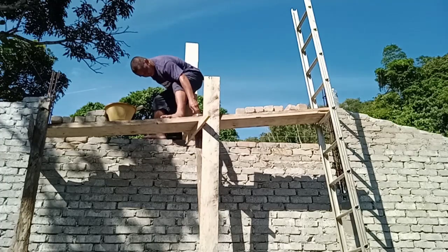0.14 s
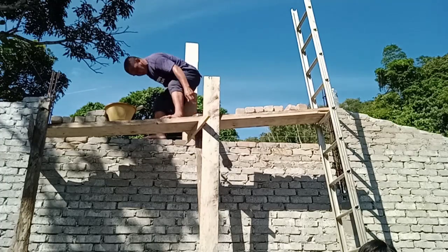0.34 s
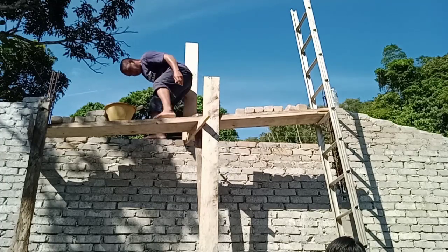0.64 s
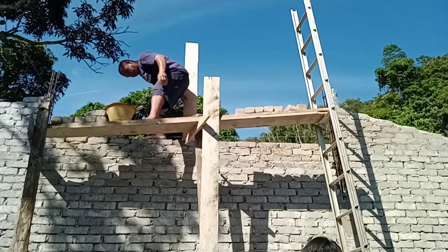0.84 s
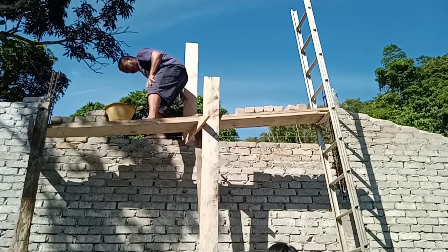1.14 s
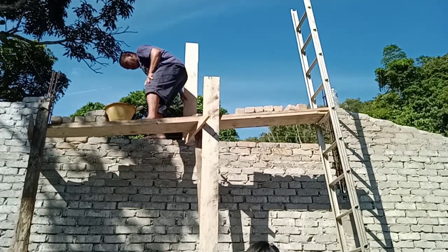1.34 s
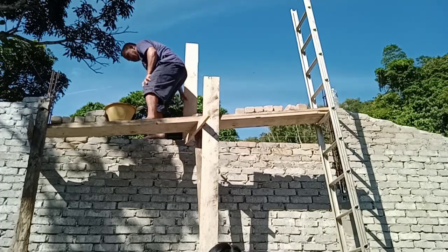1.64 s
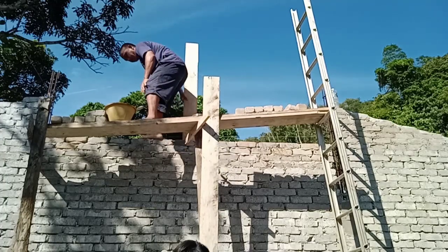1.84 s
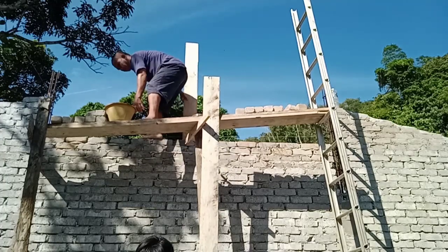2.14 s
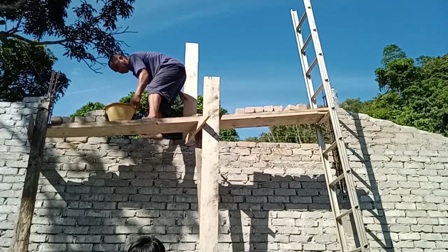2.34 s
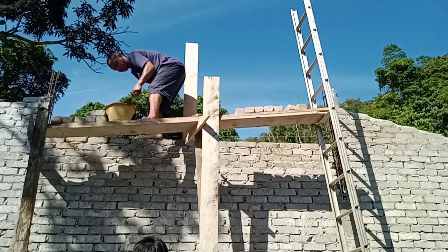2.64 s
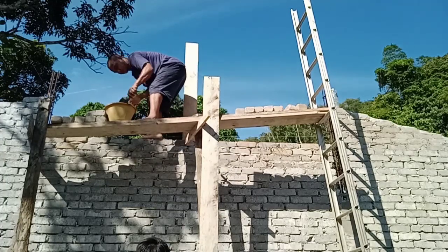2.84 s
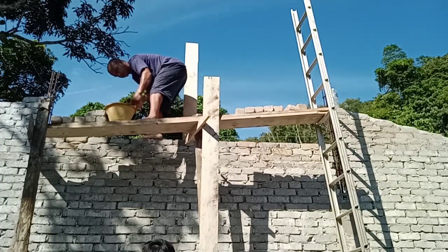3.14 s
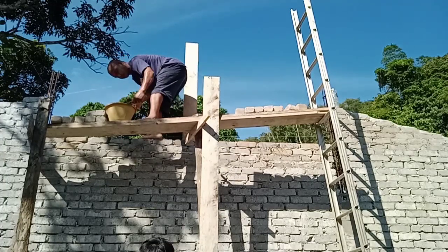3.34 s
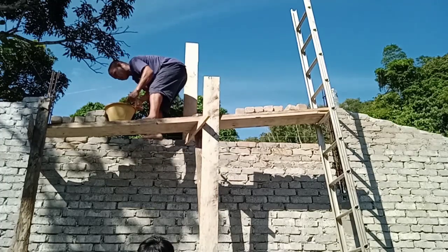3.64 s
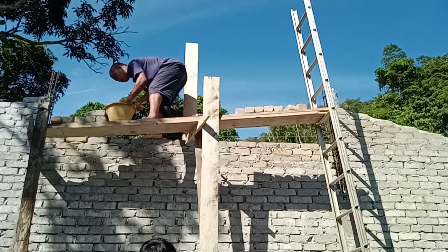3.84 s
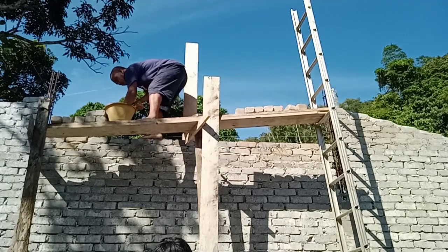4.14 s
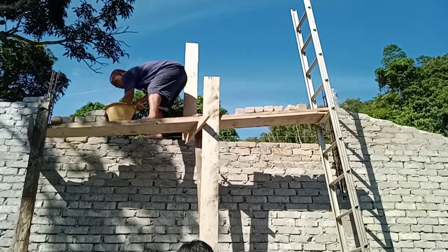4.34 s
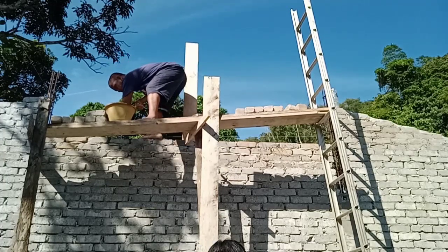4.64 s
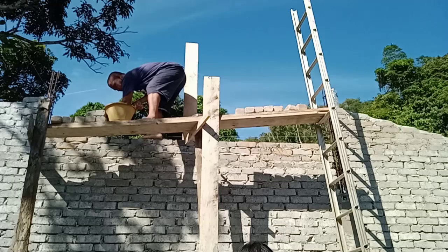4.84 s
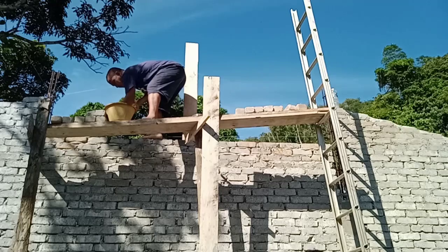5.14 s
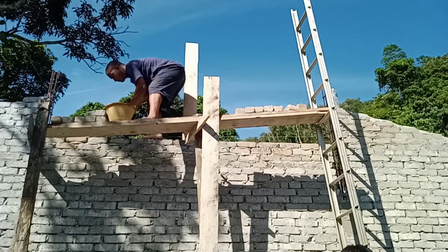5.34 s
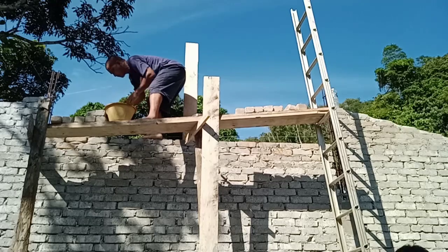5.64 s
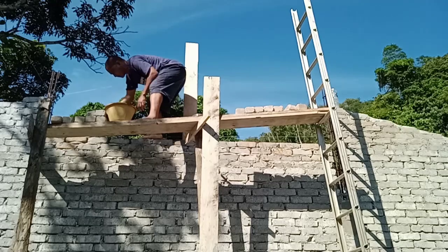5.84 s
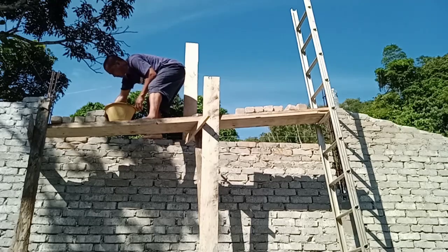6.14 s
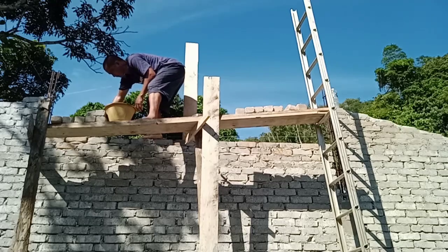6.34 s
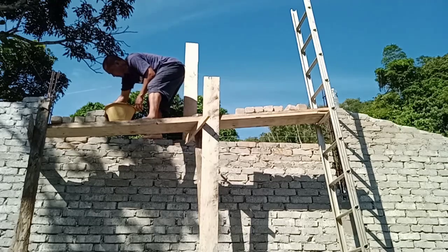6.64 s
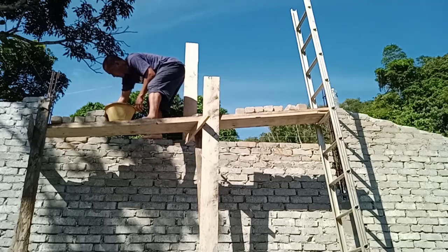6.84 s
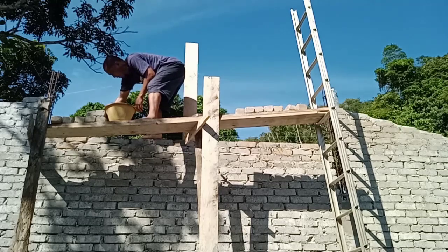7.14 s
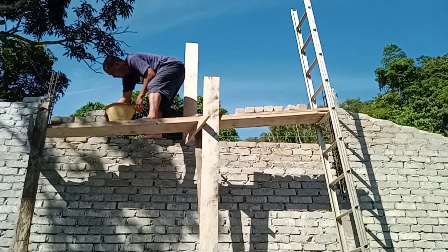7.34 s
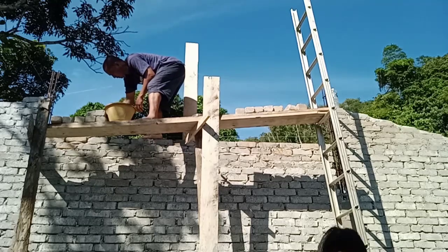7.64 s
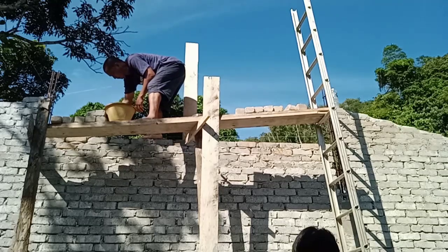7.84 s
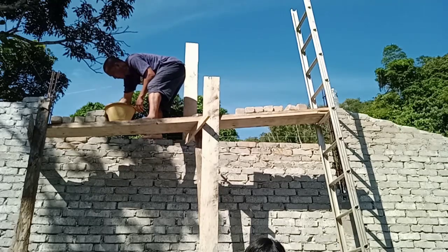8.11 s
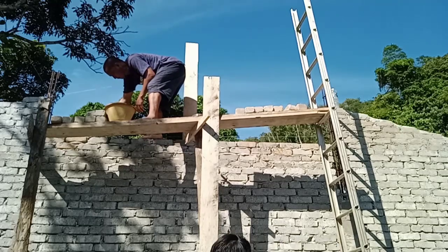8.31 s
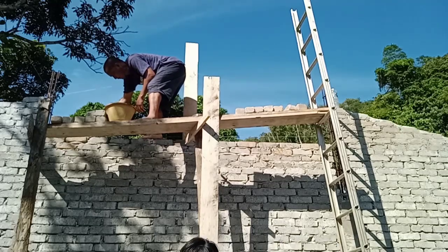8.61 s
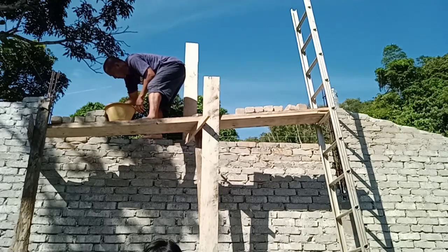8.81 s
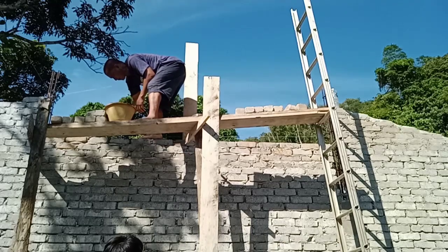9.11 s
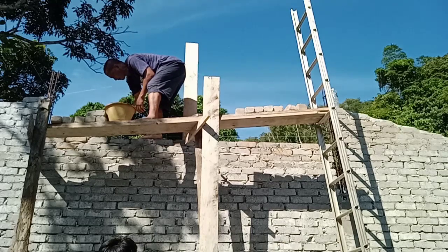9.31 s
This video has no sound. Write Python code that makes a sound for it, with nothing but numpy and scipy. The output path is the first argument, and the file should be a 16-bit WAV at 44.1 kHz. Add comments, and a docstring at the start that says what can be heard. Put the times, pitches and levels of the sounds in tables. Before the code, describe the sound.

A mason works outdoors: heavy woody brick thuds, then gritty scrapes and light trowel taps, with cicadas, faint crickets and brief bird whistles.

```python
"""A mason works on a plank scaffold: bricks thud on the boards, a trowel knocks and scrapes in the mortar tub.
Blows are clattering contacts that ring plank modes and crack off the brick; scrapes are filtered sand-grain clicks.
Cicadas drone as patchy noise, crickets trill and birds whistle as nearly pure tones, over a hum and faint air.
Walls and trees throw the work back as a sparse-tap echo."""
import sys
import numpy as np
from scipy import signal
from scipy.fft import rfft, irfft
from scipy.io import wavfile
from scipy.ndimage import uniform_filter1d

SR = 44100
rng = np.random.default_rng(int(sys.argv[2]) if len(sys.argv) > 2 else 0)


def waveform_to_disk(signal):
    """Save audio, clipped to [-1, 1], as 16-bit WAV at the path in sys.argv[1]."""
    frames = np.transpose(np.atleast_2d(signal))
    scaled = np.clip(frames, -1, 1) * 32767
    samples = np.round(scaled).astype(np.int16)
    wavfile.write(sys.argv[1], SR, samples)


def nominal_scale(level):
    """Amplitude ratio for a level in decibels (scalar or array-like)."""
    x = np.asarray(level, float) / 20
    return 10 ** x


N = 417627  # samples

HUM_HZ, HUM_WIDTH_HZ = 1260, 18  # narrow resonance, loudest when the mortar tub is rubbed


def evened(x):
    """Scales to rms 1."""
    return x / np.sqrt(np.mean(x ** 2) + 1e-20)


def read(points, hz):
    """Interpolates a (f/Hz, value) table on a log-frequency axis."""
    f, value = np.transpose(points)
    return np.interp(np.log(hz + 1), np.log(f + 1), value)


def add(mix, s, sound):
    """Mixes a sound in at time s, in place."""
    part = mix[max(round(s * SR), 0):][:len(sound)]
    part += sound[:len(part)]


def colour(x, points):
    """Filters by a spectrum, then scales to rms 1."""
    gain = nominal_scale(read(points, np.fft.rfftfreq(len(x), 1 / SR)))
    return evened(irfft(rfft(x) * gain, len(x)))


def resonate(x, hz, width_hz):
    """Resonance of gain 1: shifts hz down to zero, smooths, shifts back."""
    turn = np.exp(2j * np.pi * np.cumsum(hz * np.ones(len(x))) / SR)
    r = np.exp(-np.pi * width_hz / SR)
    return 2 * (turn * signal.lfilter([1 - r], [1, -r], x / turn)).real


def wander(hz):
    """Slow chance of rms 1, changing about hz times a second."""
    size = round(SR / hz)
    knots = N // size + 2
    return evened(np.interp(np.arange(N), np.arange(knots) * size, rng.standard_normal(knots)))


def grains(per_s, spread_db, size=N):
    """Sparse clicks of random sign, a few of them large."""
    chance, sign, big = rng.random(size), rng.standard_normal(size), rng.exponential(1, size)
    return (chance < per_s / SR) * sign * nominal_scale(spread_db * np.minimum(big, 4))


def patchy(x, points, patchy_db, size=(5, 6)):
    """Colours x by a spectrum and by loud and soft patches of size (bins, frames); rms 1."""
    hz, t, z = signal.stft(x, SR, nperseg=512, noverlap=256)
    patches = rng.standard_normal(z.shape[::-1]).T
    patches = uniform_filter1d(patches, size=size[0], axis=0)
    patches = evened(uniform_filter1d(patches, size=size[1], axis=1))
    z = z * nominal_scale(read(points, hz)[:, None] + patchy_db * patches)
    return evened(signal.istft(z, SR, nperseg=512, noverlap=256)[1][:N])


def open_air():
    """Faint broadband noise, alike in both channels."""
    # spectrum of the air: f/Hz, relative density/dB
    air_spectrum = [(18, -43), (30, 0), (48, 12), (109, 1.5), (830, -6), (1120, -4.5), (1270, -7),
                    (1470, -11), (4410, -10), (4700, -55), (6110, -45.5), (10300, -120)]
    return nominal_scale(-71) * patchy(rng.standard_normal(N), air_spectrum, patchy_db=1.8)


def side_noise():
    """Faint noise of opposite sign left and right."""
    # spectrum of the left-right difference: f/Hz, relative density/dB
    side_spectrum = [(35, -33), (60, -7.5), (921, -12.5), (1260, -5.5), (1490, -10), (5310, -19),
                     (6270, -57.5), (8750, -45), (11400, -65.5), (19200, -120)]
    unlike = nominal_scale(-76.5) * patchy(rng.standard_normal(N), side_spectrum, patchy_db=3.0)
    return np.array([unlike, -unlike])


def faint_hum():
    """Noise through the narrow resonance, drifting in level around -79 dB."""
    tone = evened(resonate(rng.standard_normal(N), HUM_HZ, HUM_WIDTH_HZ))
    return tone * nominal_scale(-79 + 2.3 * wander(4.4))


def cicadas():
    """Many insects blur into patchy noise: a wavering drone and a thin top with its overtone."""
    # spectrum of the drone: f/Hz, relative density/dB
    drone_spectrum = [(3350, -50.5), (5400, -12), (5900, -19.5), (6520, -24), (7080, 2), (7340, 6.5),
                      (7720, 3.5), (8320, -3.5), (8750, -9), (11400, -46.5), (19200, -120)]
    # spectrum of the thin top: f/Hz, relative density/dB
    sheen_spectrum = [(8800, -32), (9300, -12.5), (10500, 0.5), (12000, -8.5), (13800, -10), (14600, -0.5),
                      (15400, 4)]
    drone = patchy(rng.standard_normal(N), drone_spectrum, patchy_db=1.4)
    sheen = patchy(rng.standard_normal(N), sheen_spectrum, patchy_db=5.0)
    return nominal_scale(-58 + 0.47 * wander(5.8)) * drone + nominal_scale(-70.5) * sheen


def crickets():
    """Nearly pure tones in soft chirps, about ten a second; leaves scatter a little fuzz around them."""
    # cricket that joins in, its tones creeping upwards: final f/Hz, climb/Hz
    rising = [(5185, 270), (5295, 215)]
    # steady cricket, one value a tone: f/Hz; starting level/dB; fade/(dB/s)
    steady_hz = 5210, 5345, 5430
    steady_db, fade_db_per_s = (-75, -75, -71.5), (0.5, 0.5, 0.2)
    rising_db = -71, -66.5
    joins_s, fade_in_s, creep_s = 1.8, 0.52, 3.8

    out, t = np.zeros(N), np.arange(N) / SR
    joined = np.clip((t - joins_s) / fade_in_s, 0, 1) ** 2
    tones = []
    for (final_hz, climb_hz), db in zip(rising, rising_db):
        tones.append((final_hz - climb_hz * np.exp((joins_s - t) / creep_s), joined * nominal_scale(db)))
    for hz, db, fade in zip(steady_hz, steady_db, fade_db_per_s):
        tones.append((hz, nominal_scale(db - fade * t)))
    for hz, level in tones:
        chirp_phase = 2 * np.pi * np.cumsum(10.5 + 1.9 * wander(3)) / SR
        chirp_db = 3.0 * np.sin(chirp_phase) + 1.8 * wander(26)
        out += level * nominal_scale(chirp_db) * np.sin(2 * np.pi * np.cumsum(hz + 9 * wander(30)) / SR)
    return out * (1 + .35 * wander(250))


def birds():
    """Short, nearly pure whistles that sag a little and flutter in level."""
    # whistles: t/s, length/s, starting f/Hz, level/dB
    whistles = [(0.01, 0.027, 6030, -52), (0.849, 0.11, 3050, -67), (0.957, 0.15, 3060, -68),
                (1.39, 0.038, 5650, -57), (5.051, 0.23, 3040, -64.5), (6.075, .04, 5630, -59.5),
                (8.79, .17, 5700, -72)]
    out = np.zeros(N)
    for s, length_s, hz, db in whistles:
        t = np.arange(0, length_s, 1 / SR)
        tone = np.sin(2 * np.pi * hz * t * (1 - 0.02 * t))
        add(out, s, nominal_scale(db) * tone * signal.windows.tukey(len(t), .4))
    return out * nominal_scale(2 * wander(60)) * (1 + .4 * wander(500))


def yard(x, echo_db):
    """Adds the echo off walls and trees: sparse taps of random sign, each band dying at its own speed."""
    # decay of the echo: f/Hz, t60/s
    decay = [(100, 0.8), (300, 0.48), (700, 0.37), (1300, 0.36), (2500, 0.4), (6000, 0.48)]
    taps = np.zeros(SR // 2)
    at = np.arange(300, len(taps) - 20, 20)
    taps[at + rng.integers(0, 20, len(at))] = rng.choice([-1., 1.], len(at))
    hz, t, z = signal.stft(taps, SR, nperseg=512)
    z = z * nominal_scale(-60 * t / read(decay, hz)[:, None])
    tail = signal.istft(z, SR, nperseg=512)[1]
    return x + nominal_scale(echo_db) * signal.oaconvolve(x, tail / np.linalg.norm(tail))[:len(x)]


def ring(centre_hz, octaves, damping):
    """The boards' answer to one click: decaying modes, favoured near centre_hz by the place struck.
    Loose planks lie side by side, so each mode is a cluster of three that differs from blow to blow."""
    # plank modes: f/Hz, width/Hz at damping 1, level/dB before the place struck weights it
    boards = [(94, 40, -4), (165, 40, -19.5), (301.3, 15, 0.5), (411, 15, -3), (586, 33, -8.5),
              (667, 24, -3), (734.4, 55, 5), (892, 35, -4), (1005, 32, -1), (1210, 27, -3.5), (1260, 60, 8),
              (1582, 56, 0), (1776, 70, -3), (1980, 31, -11.5), (2253, 270, -9.5), (2740, 200, -14.5),
              (3348, 120, -17)]
    hz, width_hz, db = np.repeat(np.transpose(boards), 3, axis=1)[:, :, None]
    hz = hz * (1 + 0.012 * rng.standard_normal(hz.shape))
    t = np.arange(SR // 4) / SR
    db = db - 6 * (np.log2(hz / centre_hz) / octaves) ** 2
    modes = nominal_scale(db) * np.exp(-np.pi * width_hz * damping * t) * np.sin(2 * np.pi * hz * t)
    return modes.sum(0) * np.cos(2 * np.pi * t)  # cosine reaches zero at the end


def stroke(length_s):
    """Pressure of one stroke: rise, hold, release."""
    t = np.arange(0, length_s + .3, 1 / SR)
    rise = np.minimum(t / (0.014 + 0.23 * length_s), 1) ** 0.99
    return rise * nominal_scale(-264.5 * np.maximum(t - length_s, 0))  # release in dB/s


def scrapes():
    """Sand grains slip under the stroke: a rasp that rings the tub, fine grit on top, a rumble in the boards."""
    # trowel and brick dragged through mortar: t/s, length/s, level/dB,
    # rumble in the boards/dB and fine grit/dB (both against the level)
    strokes = [ (0.07, 0.083, -54, -20, -12.5), (0.186, 0.086, -74, 7, -12), (0.605, 0.11, -63, -3.5, -23),
               (0.788, 0.077, -69, 0.5, -18), (0.904, 0.26, -69, -2, -22), (1.196, .07, -55, -32, -17),
               (1.265, 0.107, -66, 7, -20), (1.656, 0.065, -45.5, -6.5, -7.5),
               (1.75, 0.063, -72.5, 11, -11.5), (1.949, .05, -66, -14, -12.5),
               (2.091, 0.096, -65.5, -9, -10), (2.186, 0.094, -49, -13, -12.5),
               (2.582, 0.082, -52.5, 2.5, -12.5), (2.642, 0.097, -52.5, 4.5, -24),
               (2.696, .17, -45.5, 7.5, -26.5), (3.124, 0.11, -55.5, -17, -10),
               (3.23, 0.15, -64, -12, -10.5), (3.382, .1, -64, -16, -13.5), (3.497, 0.1, -66.5, -5, -12.5),
               (4.189, 0.087, -70, 5.5, -9), (4.303, 0.0515, -56.5, -12, -12), (4.569, 0.037, -64, 7, -23),
               (4.671, 0.076, -60.5, -1.5, -18), (4.82, .04, -69, -4, -16), (4.938, 0.027, -66, -26, -7),
               (4.989, .08, -72, 8, -12), (5.097, 0.106, -62.5, -15, -17.5), (5.329, 0.02, -57.5, 1.5, -17),
               (5.449, 0.043, -72, 2, -17), (5.499, .08, -59, -9.5, -3), (5.606, 0.05, -68.5, -5.5, -7.5),
               (5.763, 0.0827, -51.5, -18.5, -6.5), (5.865, .06, -57, -19, -9.5),
               (6.007, 0.11, -71.5, -2.5, -18), (6.26, 0.052, -66.5, -0.5, -18),
               (6.474, 0.15, -69.5, -8, -12), (6.626, 0.1, -62.5, -17, -8), (6.728, 0.061, -58.5, -8.5, -5),
               (6.86, 0.0371, -57.5, -18, -6), (7.188, 0.025, -69.5, -1, -9),
               (7.304, 0.076, -69.5, -5, -12), (7.364, 0.074, -50.5, -8.5, -14),
               (7.759, .05, -60.5, -6.5, -25), (7.938, 0.084, -68, -12.5, -4.5),
               (8.041, 0.0874, -53, -14.5, -13), (8.175, 0.017, -46.5, -7, -22),
               (8.246, .05, -55.5, -6.5, -4), (8.321, 0.086, -55.5, -2.5, -8),
               (8.45, 0.082, -67.5, -15, -5.5), (8.686, 0.047, -52.5, -11, -11.5),
               (8.723, 0.017, -70, 6, -17), (8.939, 0.014, -61.5, -23, -15.5),
               (9.027, 0.13, -65.5, -9.5, -14), (9.188, 0.091, -62, -8, -6),
               (9.379, 0.036, -60.5, -14, -11), (9.447, .04, -57, -17, -21)]
    # spectrum of the rasp: f/Hz, relative density/dB
    rasp_spectrum = [(290, -23.5), (500, -11), (959, -5.5), (1220, -3.5), (1490, -4), (2560, -2),
                     (4350, -5.5), (5430, -4.5), (7000, -20.5), (9100, -34), (15400, -120)]
    # spectrum of the grit: f/Hz, relative density/dB
    grit_spectrum = [(5000, -37), (6500, 8), (9000, -0.5), (12000, -7.5), (14000, -11.5), (16000, -2)]
    rasp = patchy(grains(4000, 0.93), rasp_spectrum, patchy_db=4, size=(3, 12))
    rasp = rasp + nominal_scale(-7.5) * evened(resonate(rasp, HUM_HZ, HUM_WIDTH_HZ))
    grit = colour(grains(3000, 2.0), grit_spectrum)
    rumble = evened(signal.oaconvolve(grains(2000, 3.1), ring(380, 7.5, 2.2))[:N])
    pressure = np.zeros((3, N))
    for s, length_s, level_db, rumble_db, grit_db in strokes:
        for layer, db in zip(pressure, (0, rumble_db, grit_db)):
            add(layer, s, nominal_scale(level_db + db) * stroke(length_s))
    out = (pressure * [rasp, rumble, grit]).sum(0)
    return yard(out * nominal_scale(3.3 * wander(40)), echo_db=-8.5)


def blow(level_db, centre_hz, octaves, clatter_s, crack_db, build_s, damping, echo_db):
    """A blow is a short clatter of contacts: they ring the boards and crack off the brick itself."""
    t = np.arange(SR // 5) / SR
    decay = np.exp(-(t / max(clatter_s, .001)) ** 0.88)
    contacts = grains(6000, 0.94, len(t)) * np.minimum(t / build_s, 1) * decay
    contacts[round(.001 * SR)] += 1.3 * np.sqrt(np.mean(contacts[:441] ** 2))  # firm touch 1 ms in
    hz = np.geomspace(50, 16000, 20)
    away = np.log2(hz / centre_hz) / octaves
    crack_spectrum_db = -np.where(away > 0, 5.5, 7.5) * away ** 2
    crack = colour(contacts, np.transpose([hz, crack_spectrum_db]))
    sound = evened(signal.fftconvolve(contacts, ring(centre_hz, octaves, damping)))
    sound[:len(t)] += nominal_scale(crack_db) * crack * np.cos(2.5 * np.pi * t)  # cosine fades the crack out
    loudest = np.sqrt(uniform_filter1d(sound ** 2, size=441).max())  # 10 ms rms
    return nominal_scale(level_db - 10.0) * yard(np.pad(sound, (0, SR // 4)), echo_db) / loudest


def add_knocks(work):
    """Trowel and brick knocks: brief, well-damped blows, each ringing around its own centre."""
    # knocks: t/s, level/dB (loudest 10 ms rms before echo, plus 10), ring centre f/Hz,
    # spread/octaves, crack against ring/dB
    knocks = [(0.973, -46, 1230, 0.37, 5), (1.347, -45.5, 299, 0.53, 6), (1.71, -34.5, 303, 0.46, 24),
              (2.982, -36.5, 423, 0.97, 15), (3.401, -48, 2960, 0.37, 16), (4.577, -28, 810, 1.06, 5.5),
              (4.826, -36.5, 1090, 0.7, -3), (5.011, -49, 1212, 0.77, -11), (5.125, -48.5, 1260, 0.2, -11),
              (5.34, -39.5, 1290, 1, -2), (5.505, -46.5, 1320, 0.6, 24), (5.896, -36.5, 1380, 0.97, 9),
              (5.919, -42, 457, 0.77, 8), (6.307, -52, 2600, 0.9, 7), (6.925, -46, 285, 0.23, 13),
              (6.96, -51, 304, 0.322, 9), (7.556, -45, 276, 0.6, 0), (7.778, -47.5, 1700, 0.44, 19),
              (7.977, -52.5, 1610, 0.27, 12), (8.058, -49, 1350, 0.27, -12), (8.182, -33.5, 1380, 0.67, 13),
              (8.265, -38.5, 1280, 0.91, -13), (8.363, -32.5, 600, 0.87, 20), (8.389, -39, 560, 0.16, 12),
              (8.749, -40.5, 1800, 0.85, 5.5), (9.033, -48, 586, 0.51, 1)]
    for s, level_db, hz, octaves, crack_db in knocks:
        knock = blow(level_db, hz, octaves, clatter_s=0.017, crack_db=crack_db,
                     build_s=.003, damping=2.4, echo_db=-3.0)
        add(work, s, knock)


def add_thuds(work):
    """Bricks set down hard: heavy blows that ring the boards around 600 Hz."""
    # thuds: t/s, level/dB (loudest 10 ms rms before echo, plus 10), ring spread/octaves,
    # clatter decay/s, crack against ring/dB
    thuds = [(0.001, -14.5, 1.29, 0.019, 5), (2.314, -20.5, 1.7, 0.021, 2.5), (2.325, -8, 1.41, 0.02, 0),
             (2.672, -24, 1.06, 0.056, 3.5), (3.606, -21, 1.35, 0.2, 7.5), (3.635, -13.5, 1.4, 0.029, 4),
             (3.645, -7.5, 1.66, 0.022, -6.5), (3.89, -10.5, 1.296, 0.034, 2.5)]
    for s, level_db, octaves, clatter_s, crack_db in thuds:
        thud = blow(level_db, 600, octaves, clatter_s, crack_db,
                    build_s=.009, damping=1.0, echo_db=-4.5)
        add(work, s, thud)


def scene():
    """Work, echoes and insects, the same in both channels but for a faint noise of opposite sign left and
    right."""
    work = scrapes()
    add_thuds(work)
    add_knocks(work)
    alike = work + cicadas() + crickets() + faint_hum() + birds() + open_air()
    return alike + side_noise()


def low_pass(x):
    """Removes everything above the highest recorded frequency."""
    return signal.sosfilt(signal.butter(12, 15500, fs=SR, output="sos"), x)


def record(dry):
    """The small microphone drops the deepest bass, below about 72 Hz."""
    high_pass = signal.butter(4, 72, "high", fs=SR, output="sos")
    thinned = signal.sosfilt(high_pass, dry)
    return low_pass(thinned)


dry = scene()
out = record(dry)
waveform_to_disk(out)
```